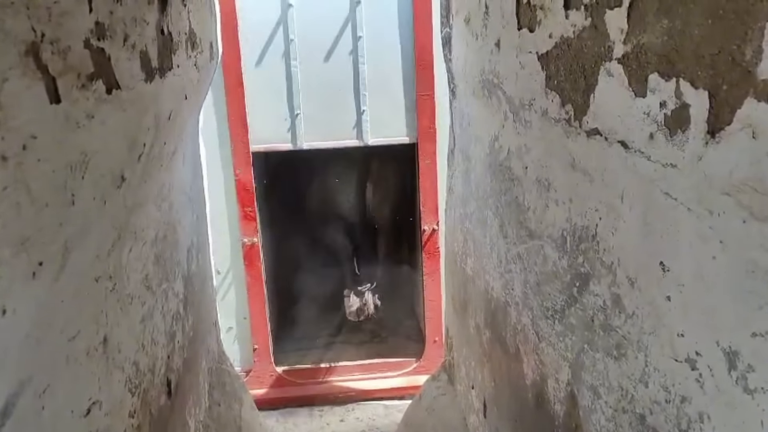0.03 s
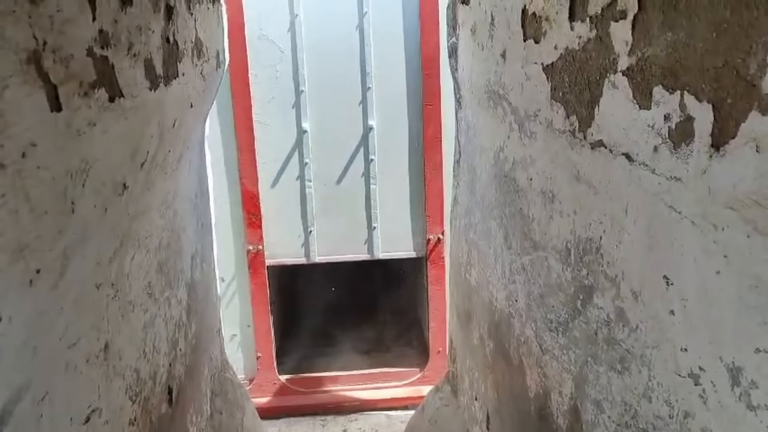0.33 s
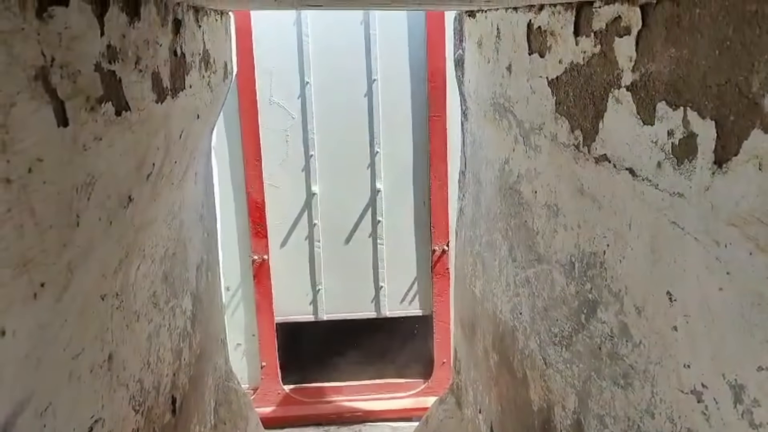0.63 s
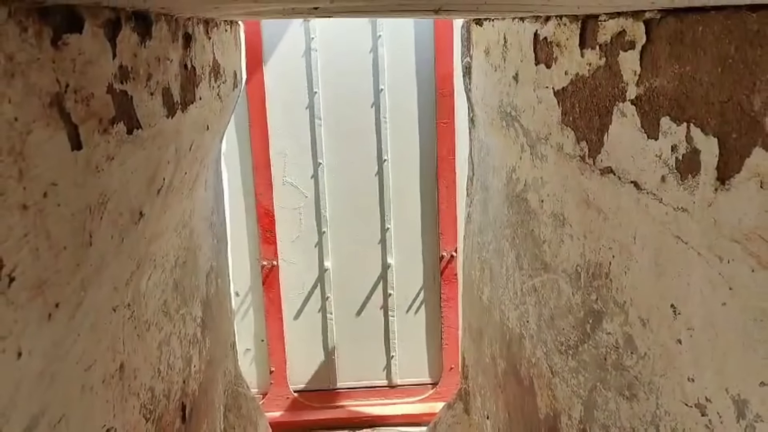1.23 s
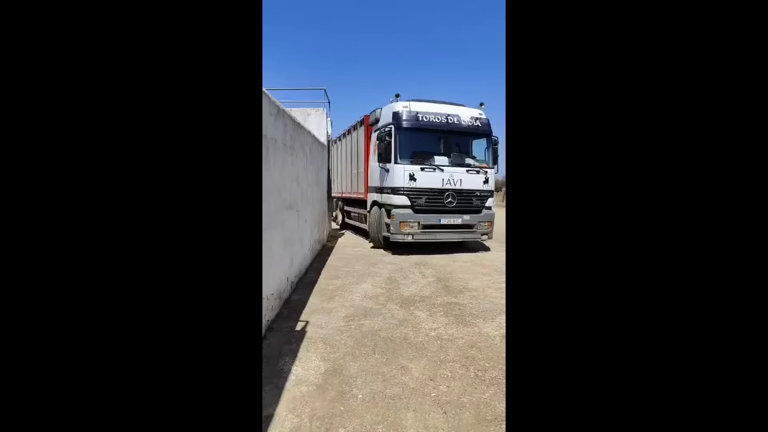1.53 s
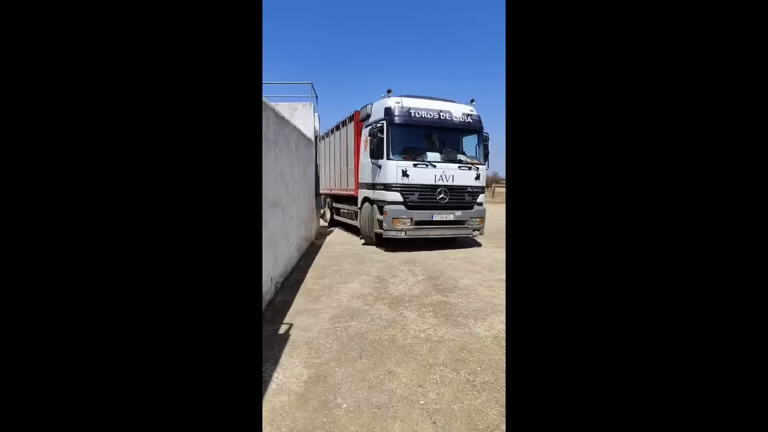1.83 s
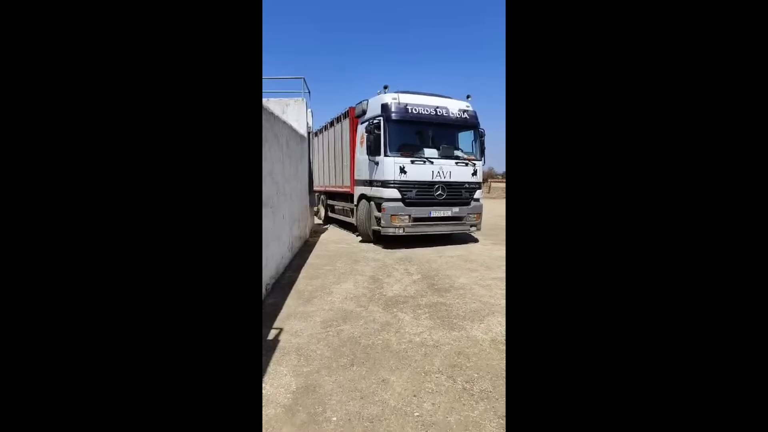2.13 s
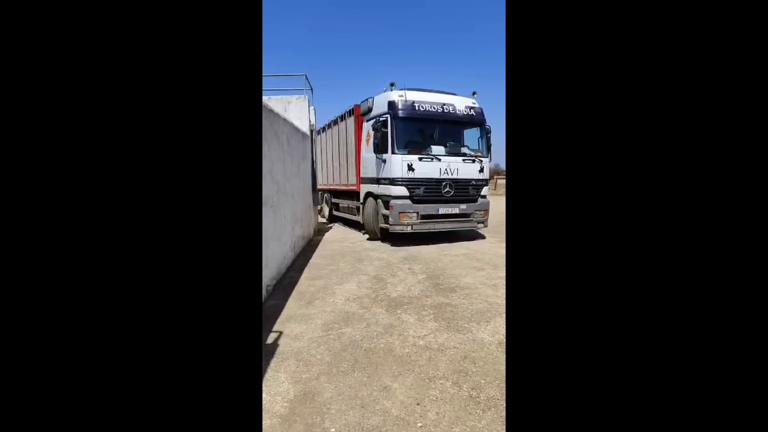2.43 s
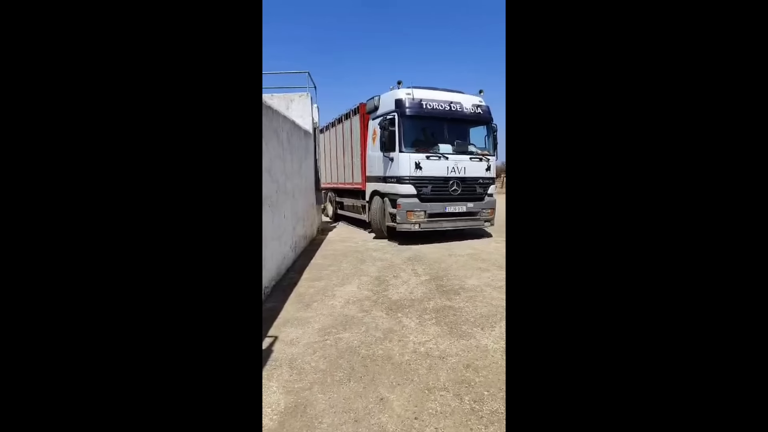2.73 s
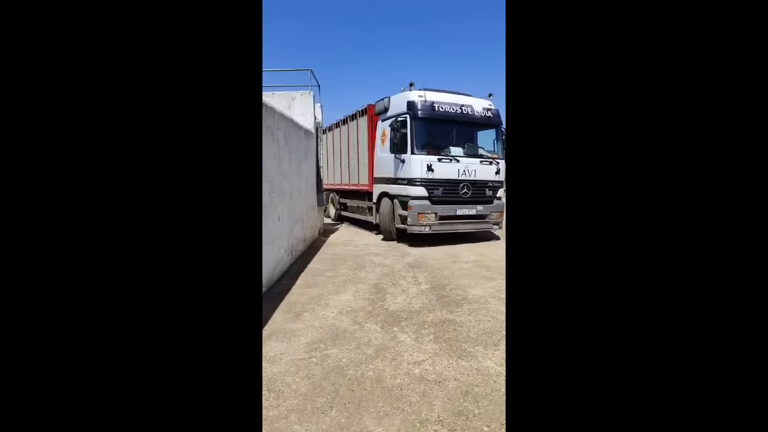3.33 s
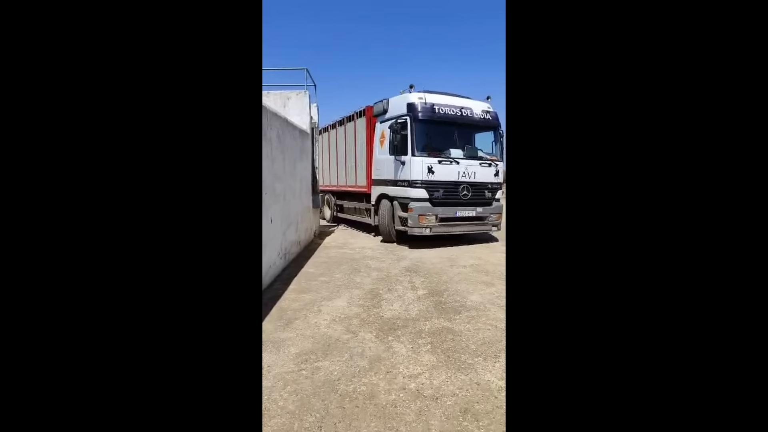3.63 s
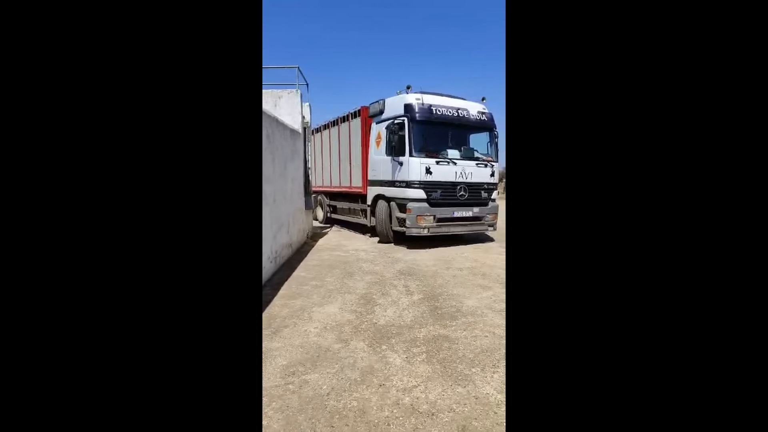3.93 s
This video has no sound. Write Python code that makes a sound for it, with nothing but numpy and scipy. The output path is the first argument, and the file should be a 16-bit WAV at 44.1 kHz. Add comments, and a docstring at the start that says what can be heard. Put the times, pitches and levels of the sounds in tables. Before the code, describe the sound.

A steel sliding door clatters, scrapes and groans down its guides in a concrete chute, landing with a booming thump close by. The sound cuts to an open yard, where a diesel truck idles steadily with a few ticks.

```python
"""A sheet-steel door slides down its guides in a concrete livestock chute, a diesel idling beyond the
walls. Impacts and friction excite the sheet's modes, so it knocks, scrapes, groans and booms. As it
lands, near 1.4 s, the scene cuts to the yard, where the six-cylinder truck fades in, idling in the
open: each firing gives an exhaust pulse, a knock and a hiss. From 1.8 s grit ticks nearby, and
around 3 s a hollow rumble swells once."""
import sys
import numpy as np
from scipy import signal
from scipy.fft import rfft, irfft
from scipy.io import wavfile
from scipy.ndimage import uniform_filter1d

SR = 44100
rng = np.random.default_rng(int(sys.argv[2]) if len(sys.argv) > 2 else 0)


def waveform_to_disk(signal):
    """Save audio, clipped to [-1, 1], as 16-bit WAV at the path in sys.argv[1]."""
    frames = np.transpose(np.atleast_2d(signal))
    scaled = np.clip(frames, -1, 1) * 32767
    samples = np.round(scaled).astype(np.int16)
    wavfile.write(sys.argv[1], SR, samples)


N = 176400
T = np.arange(N) / SR
HZ = np.fft.rfftfreq(N, 1 / SR)

# Strength of each cylinder, in firing order: knock_db, hiss_db
CYLINDERS = [(-1, 2), (-1.5, 2.5), (-2.5, 3), (1, 3.5), (2.5, 3), (1.5, 2)]


def amp(db):
    """Decibels to amplitude ratio."""
    return 10 ** (np.asarray(db) / 20)


def curve(points):
    """Gain envelope through points of time_s, level_db."""
    return amp(np.interp(T, *np.transpose(points)))


def over_frequency(points):
    """A table interpolated along log frequency."""
    hz, value = np.transpose(points)
    return np.interp(np.log(HZ + 1), np.log(hz), value)


def pan(db):
    """Direction by level difference: left exceeds right by db."""
    return amp(np.array([[db], [-db]]) / 2)


def noise(colour, grain_db=0):
    """Filtered, partly coherent stereo noise of unit RMS; random modulation makes it gritty."""
    # Left-right coherence: frequency_hz, coherence_ratio
    likeness = [(60, 0.92), (130, 1), (260, 0.99), (500, 0.53), (1000, 0.58), (2000, 0.01), (8000, 0)]
    grain = amp(grain_db * np.repeat(rng.standard_normal(N // 30 + 1), 30)[:N])
    band_edges = HZ ** 2 / (HZ ** 2 + 400) / (1 + (HZ / (2 * colour[-1][0])) ** 4)
    mid, side = rfft(rng.standard_normal((2, N)) * grain) * amp(over_frequency(colour)) * band_edges
    coherence = np.clip(over_frequency(likeness), 0, 1)
    mid, side = mid * np.sqrt(1 + coherence), side * np.sqrt(1 - coherence)
    stereo = irfft(np.array([mid + side, mid - side]), N)
    return stereo / stereo.std()


def wander(points):
    """Random drift through Gaussian values spread evenly over the scene."""
    return np.interp(T, np.linspace(0, T[-1], points), rng.standard_normal(points))


def since(start_s):
    """Seconds elapsed after start_s, zero before it."""
    return np.maximum(T - start_s, 0)


def burst(start_s, fall_s):
    """Transient envelope: a millisecond of attack, then exponential decay."""
    return np.minimum(since(start_s) * 1000, 1) * np.exp(-since(start_s) / fall_s)


def arch(start_s, length_s):
    """Rounded envelope: the root of half a sine."""
    return np.sqrt(np.sin(np.pi * np.clip((T - start_s) / length_s, 0, 1)).clip(0))


def mode(hz, t60):
    """One second of a damped oscillator's free vibration."""
    return np.sin(2 * np.pi * hz * T[:SR]) * np.exp(-np.log(1000) * T[:SR] / t60)


def chute_rumble():
    """Reflection traps low sound between the walls; it ebbs in the second half of the slide."""
    # Rumble spectrum: frequency_hz, density_db
    colour = [(20, -23), (32, -9), (50, -1), (64, -19), (100, -3.5), (160, -15), (300, -43)]
    return noise(colour) * curve([(0, -20.5), (.4, -21), (.65, -19), (1.39, -29.5)])


def scuffs():
    """Friction on the gritty yard gives faint bursts of high noise."""
    # Scuffs: start_s, fall_s, level_db
    events = [(1.875, .005, -47), (2.295, .02, -42), (2.47, 0.06, -46), (3.178, 0.0066, -42.5),
              (3.70, .008, -37.5)]
    # Scuff spectrum: frequency_hz, density_db
    colour = [(3000, -22), (6000, -3), (7000, 3), (9500, 1), (12000, -11), (16000, -18)]
    return noise(colour, grain_db=4) * sum(amp(db) * burst(s, fall) for s, fall, db in events)


def hollow_rumble():
    """Noise with a narrow spectral peak sounds hollow; it swells once and gathers into a wavering hum."""
    # Rumble spectrum: frequency_hz, density_db
    colour = [(100, -25), (170, -6), (220, -7.5), (258, 4), (300, -7.5), (380, -8), (500, -16),
              (700, -14.5), (1400, -30), (3000, -55)]
    # Rumble envelope: time_s, level_db
    rumble_levels = [(2.75, -36.5), (2.95, -27), (3.02, -22), (3.085, -19.5), (3.16, -27), (3.3, -37),
                     (3.6, -53)]
    # Hum envelope: time_s, level_db
    hum_levels = [(2.85, -55), (2.94, -34), (3.02, -36), (3.085, -18), (3.16, -23.5), (3.25, -55)]
    hum_hz = 258 * (1 + 0.024 * wander(200))
    hum = np.sin(2 * np.pi * np.cumsum(hum_hz) / SR)
    return noise(colour) * curve(rumble_levels) + hum * curve(hum_levels)


def grit_ticks():
    """Grit ticks close by: each tick is a minimum-phase impulse response, a snap with a short ring."""
    # Ticks: start_s, peak_db, pan_db, lowpass_hz
    events = [(1.8216, -10.5, 0, 2800), (1.8238, -14.5, 0, 2800), (1.848, -23, 0, 2800),
              (2.5012, -15, -13, 7000), (2.7707, -12.5, -14.5, 7000)]
    # Tick spectrum: frequency_hz, density_db
    colour = [(300, -35), (1200, 11), (2500, 14), (3400, 3), (4600, 8), (6500, -25), (10000, -27),
              (16000, -38)]
    out = np.zeros((2, N))
    for start_s, peak_db, pan_db, lowpass_hz in events:
        log_gain = np.log(amp(over_frequency(colour)) / np.sqrt(1 + (HZ / lowpass_hz) ** 4))
        causal_cepstrum = irfft(log_gain, N) * 2 * (np.arange(N) < N // 2)
        click = irfft(np.exp(rfft(causal_cepstrum)), N)[:2048]
        start = round(start_s * SR)
        out[:, start:start + len(click)] += amp(peak_db) * pan(pan_db) * click / abs(click).max()
    return out


def exhaust(orders, firing_hz, firing_at_s):
    """Periodic exhaust pulses form harmonics of the six-firing cycle; the upper ones waver most."""
    jitter_s, waver_db = 0.0002, 3.0
    cycles = (T - firing_at_s + jitter_s * wander(30)) * firing_hz / len(CYLINDERS)
    pressure = 0
    for order, db in orders:
        gain = amp(db + waver_db * min(order / 40, 1) * wander(30))
        pressure -= gain * np.cos(2 * np.pi * order * cycles)
    return pressure * pan(-0.06)


def engine_beyond_walls():
    """Walls pass low frequencies best: only the diesel's low exhaust orders reach the chute."""
    # Exhaust harmonics: order, peak_db
    orders = [(6, -13), (9, -40), (11, -33.5), (18, -47), (21, -35.5), (24, -33.5)]
    return exhaust(orders, firing_hz=28.04, firing_at_s=0.6)


def engine_clacks():
    """Four harder clacks from the engine: transients with their energy near 1 kHz."""
    # Clacks: start_s, level_db
    events = [(1.968, -26), (2.359, -20), (3.327, -15.5), (3.829, -21)]
    # Clack spectrum: frequency_hz, density_db
    colour = [(300, -29), (700, -5), (1000, 10), (1400, -12), (2200, -11), (4000, -17), (8000, -45.5)]
    return noise(colour) * sum(amp(db) * burst(s, fall_s=.009) for s, db in events)


def engine_in_yard():
    """Combustion modulates the block's drone, the knock and the hiss at the exhaust's firing rate."""
    # Exhaust harmonics: order, peak_db
    orders = [(6, -14.5), (9, -27), (12, -29), (13, -37), (16, -62), (18, -25.5), (20, -31), (21, -53),
              (24, -48), (39, -43.5), (46, -40.5), (54, -45), (65, -35), (73, -40), (92, -34.5)]
    # Spectra of block drone, diesel knock and hiss: frequency_hz, density_db
    block_colour = [(30, 7), (90, 7.5), (130, 1), (200, -1), (300, -4), (440, 0), (560, -4.5), (800, -7),
                    (1300, -46), (3000, -36)]
    knock_colour = [(350, -30), (600, -13.5), (800, -1), (920, 1.5), (1050, 4), (1160, -2), (1320, -16),
                    (1800, -14), (4000, -28)]
    hiss_colour = [(600, -14), (1400, 0.5), (2400, 1), (3400, -5.5), (5200, -9), (6900, -12.5),
                   (7800, -23.5), (9800, -19), (13500, -32), (15500, -26)]
    firing_hz, firing_at_s, lag_firings, scatter_db = 27.965, 2.206, 0.6, 0.6
    firings = (T - firing_at_s) * firing_hz
    count = np.floor(firings).astype(int)
    cylinder_db = np.array(CYLINDERS, float)[count % len(CYLINDERS)].T
    firing_db = cylinder_db + scatter_db * rng.standard_normal(256)[count]
    knock_db, hiss_db = uniform_filter1d(firing_db, size=200)
    beat = np.cos(2 * np.pi * (firings - lag_firings))
    rattle_db = 1.2 * wander(800)  # 5 ms grains
    block = noise(block_colour) * amp(-27 + 0.5 * beat)
    knock = noise(knock_colour, grain_db=1) * amp(-30.5 + knock_db + rattle_db + 2 * beat)
    hiss = noise(hiss_colour, grain_db=1.5) * amp(-40.5 + hiss_db + 1.5 * beat)
    return block + (knock + hiss) * pan(-1) + exhaust(orders, firing_hz, firing_at_s)


def latch():
    """A brief impact has a broad spectrum: the latch clicks just before the door lands."""
    # Latch spectrum: frequency_hz, density_db
    colour = [(600, -22), (1400, -8), (2500, 5), (3400, -2), (4700, -3), (6500, -17), (8000, -32),
              (16000, -45)]
    return noise(colour) * amp(-25) * burst(start_s=1.277, fall_s=.009) * pan(-10)


def guides():
    """Friction of steel on steel gives broadband rasps and one narrowband squeak."""
    # Rasps: start_s, length_s, level_db
    events = [(0.174, 0.024, -27), (0.394, 0.013, -39), (0.534, .025, -39.5), (0.88, 0.056, -43.5),
              (1.106, 0.058, -44), (1.2, 0.036, -37)]
    # Rasp spectrum: frequency_hz, density_db
    colour = [(3000, -15), (5500, -4), (6600, 2.5), (7000, 5), (7600, -9), (9000, -5.5), (9500, -5.5),
              (10500, -14), (13000, -18), (16000, -18)]
    rasps = noise(colour, grain_db=1) * sum(amp(db) * arch(s, length) for s, length, db in events)
    squeak_hz, width_hz = 4140, 220
    peak = [(squeak_hz + k * width_hz, db) for k, db in [(-3, -45), (-1, -4), (0, 0), (1, -4), (3, -45)]]
    return rasps + noise(peak) * arch(start_s=1.02, length_s=0.065) * amp(-43) * pan(-14)


def groans():
    """Where the door binds, stick-slip motion drives a cluster of wavering resonances."""
    # Moments of binding: start_s, length_s, level_db
    binds = [(0.386, 0.013, -29), (0.739, 0.051, -17), (1.118, 0.081, -28.5)]
    # Driven resonances: pitch_hz, level_db
    resonances = [(702, 0.5), (740, 2), (850, -1), (885, -3.5), (975, -0.5), (1030, -9), (1158, -5.5)]
    waver_hz, rise_s, fall_s = 22.3, .004, 0.023
    tone = np.zeros((2, N))
    for channel in tone:
        for hz, db in resonances:
            cycles = np.cumsum(hz + waver_hz * wander(600)) / SR + rng.random()
            channel += amp(db) * np.sin(2 * np.pi * cycles)
    tone = tone + .15 * tone[::-1]  # a little of each side in the other
    grip = sum(amp(db) * np.minimum(since(s) / rise_s, 1) * np.exp(-since(s + length) / fall_s)
               for s, length, db in binds)
    return tone / tone.std() * grip


def panel_booms():
    """Jolts excite the lowest bending modes of the whole sheet, which thumps as it lands on the sill."""
    # Jolts: start_s, level_db
    jolts = [(0.05, -14.5), (0.19, -13), (0.799, -10), (0.946, -14), (1.366, -10.5)]
    # Bending modes: pitch_hz, level_db, t60_s
    bending_modes = [(80.9, -1, 0.7), (102.37, 1, 1), (131.5, -3.5, 0.27), (146.1, 1, 0.44)]
    rise_s, landing_s = 0.014, 1.357
    ring = sum(amp(db) * mode(hz, t60) for hz, db, t60 in bending_modes) * np.minimum(T[:SR] / rise_s, 1)
    booms = sum(amp(db) * np.interp(T - s, T[:SR], ring, 0, 0) for s, db in jolts)
    thump = amp(-11.5) * np.interp(T - landing_s, T[:SR], mode(hz=171.5, t60=0.19), 0, 0)
    return (booms + thump) * pan(0.5)


def door():
    """Impacts and sliding friction add in power and drive the dense resonances of the steel sheet."""
    # Impacts on the guides: start_s, body_db, clang_db, clatter_db
    knocks = [(0.0, -32, -21.5, -24.5), (0.027, -22, -17.5, -18.5), (0.052, -12.5, -12.5, -25),
              (0.067, -31, -26, -16), (0.103, -27, -36, -40), (0.124, -16, -17.5, -22.5),
              (0.175, -23, -21, -21.5), (0.264, -23, -29, -23), (0.351, -24, -23, -26.5),
              (0.389, -21, -20, -43), (0.438, -20.5, -29, -29), (0.549, -27, -28, -28),
              (0.67, -39, -27, -25), (0.697, -22, -19.5, -45), (0.747, -20, -16.5, -47),
              (0.767, -27, -16.5, -47), (0.807, -11, -25, -24.5), (0.898, -13.5, -33, -37),
              (0.957, -16, -43, -50), (1.132, -17.5, -25.5, -59), (1.160, -17.5, -40, -46),
              (1.211, -16.5, -45, -33.5), (1.349, -12.5, -13, -24.5), (1.37, -33, -42, -35)]
    # Decay time constants, a row each for body, clang and clatter: fall_s, ring_s
    decays = [(0.022, 0.13), (0.021, 0.078), (0.025, 0.12)]
    # Spectra of those three parts: frequency_hz, density_db
    body_colour = [(70, -35), (125, 3), (170, -4), (250, 2.5), (340, -4), (520, -1), (700, -14),
                   (1200, -43)]
    clang_colour = [(300, -21), (550, -4), (720, -2.5), (1000, -3), (1250, -7), (1600, -16), (2500, -19),
                    (5000, -50)]
    clatter_colour = [(700, -24), (1600, 1.5), (2900, -0.5), (4300, -2.5), (5800, -9.5), (6900, -6.5),
                      (7700, -19.5), (9000, -17.5), (13000, -30), (16000, -29)]
    # Sliding friction envelope: time_s, level_db
    slide_levels = [(0, -22), (.2, -19.5), (.45, -24.5), (.64, -28), (.76, -22.5), (.95, -26),
                    (1.08, -26.5), (1.2, -25), (1.33, -26)]
    # Sheet resonances: pitch_hz, gain_db, t60_s
    sheet_modes = [(239.7, -2, 0.24), (306, -1.5, 0.54), (447.4, -5, 0.83), (496, -8, 0.52),
                   (582, 2.5, 0.87), (701, 5, 0.33), (730, -2, 0.31), (882, -3, .4), (966, -9, 0.44),
                   (1183, 2.5, 0.55), (1900, 2, .4), (2370, -3, 0.34), (3060, 5, 0.22), (4160, 0, 0.15)]
    attack_s, ring_db = 0.0029, -7.5
    friction_db, pan_db = (0, -6.5, -16), (2.5, 1.4, -1.4)  # body, clang, clatter
    drive = np.zeros((2, N))
    for part, colour in enumerate((body_colour, clang_colour, clatter_colour)):
        fall_s, ring_s = decays[part]
        power = (curve(slide_levels) * amp(friction_db[part])) ** 2
        for start_s, *levels_db in knocks:
            age = since(start_s)[:2 * SR]
            onset = amp(levels_db[part]) * np.minimum(age / attack_s, 1)
            decay = np.exp(-2 * age / fall_s) + amp(ring_db) ** 2 * np.exp(-2 * age / ring_s)
            power[:2 * SR] += onset ** 2 * decay
        drive += noise(colour, grain_db=1.5) * np.sqrt(power) * pan(pan_db[part])
    # Each mode is scaled to have its gain_db at resonance.
    response = sum(amp(db) * mode(hz, t60) * 2 * np.log(1000) / (t60 * SR) for hz, db, t60 in sheet_modes)
    return drive + signal.fftconvolve(drive, response[None], axes=1)[:, :N]


def scene():
    """Sources superpose in each place: first the chute, then a cut, then the yard fading in."""
    # Fade into the yard: time_s, gain_db
    yard_fade = [(1.432, -26), (1.52, -11), (1.6, -6.5), (1.7, -3), (1.85, -.5), (2.6, 0), (3.3, 0.27),
                 (4, 0.6)]
    cut_s, yard_s = 1.3905, 1.432
    chute = chute_rumble() + engine_beyond_walls() + latch() + guides() + groans() + panel_booms() + door()
    yard = scuffs() + hollow_rumble() + engine_clacks() + engine_in_yard()
    chute_gate = np.clip((cut_s - T) * 1000, 0, 1)
    return chute * chute_gate + yard * curve(yard_fade) * (T > yard_s) + grit_ticks()


def record(dry):
    """Soft saturation rounds the peaks; a low-pass filter then limits the band."""
    rounded = dry / (1 + abs(dry) ** 8) ** (1 / 8)
    lowpass = signal.firwin(511, cutoff=15950, window=("kaiser", 9), fs=SR)
    return signal.oaconvolve(rounded, lowpass[None], "same")


dry = scene()
out = record(dry)
waveform_to_disk(out)
```